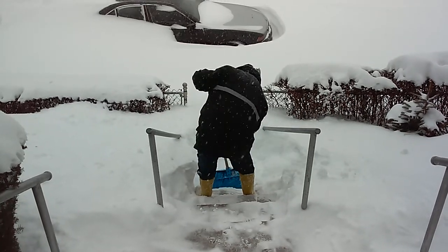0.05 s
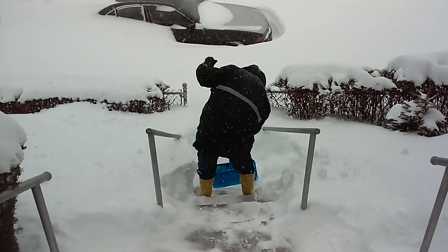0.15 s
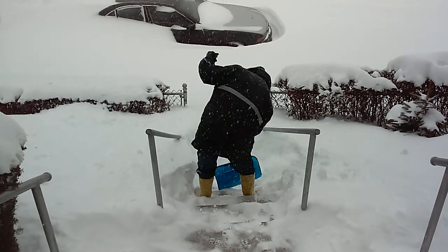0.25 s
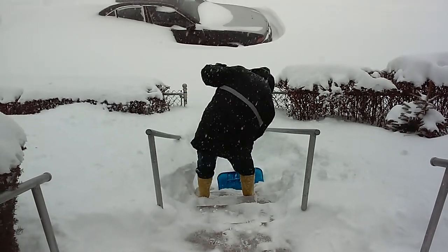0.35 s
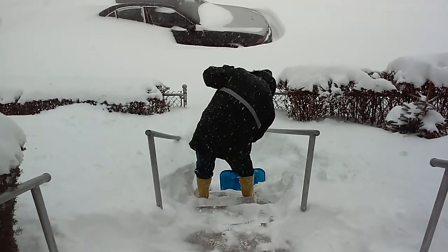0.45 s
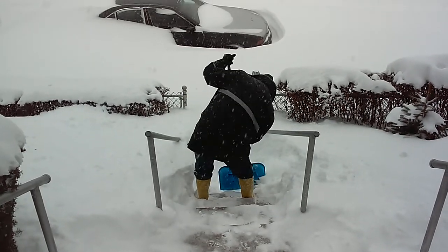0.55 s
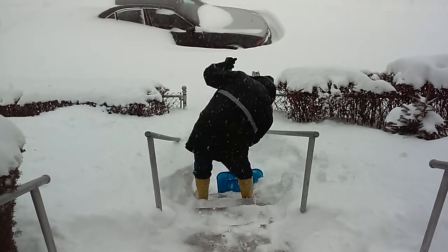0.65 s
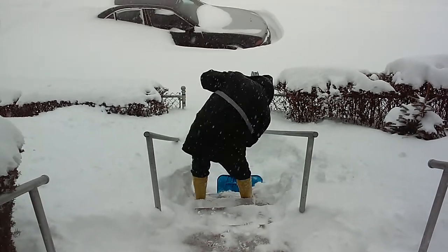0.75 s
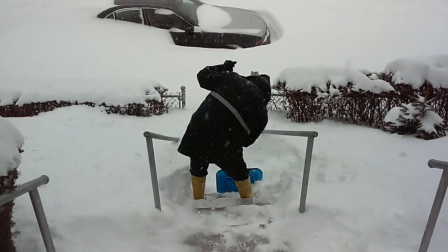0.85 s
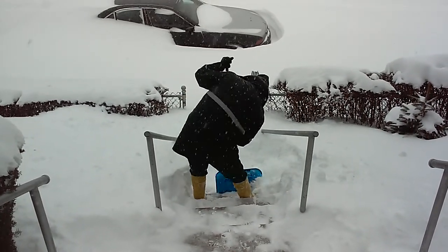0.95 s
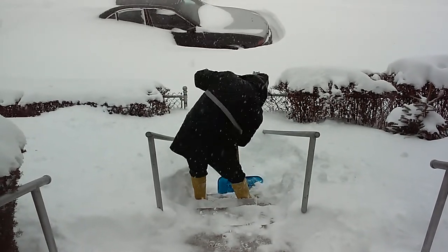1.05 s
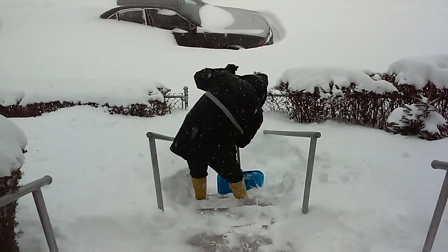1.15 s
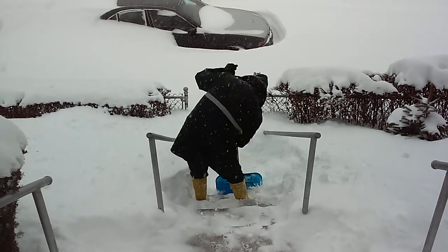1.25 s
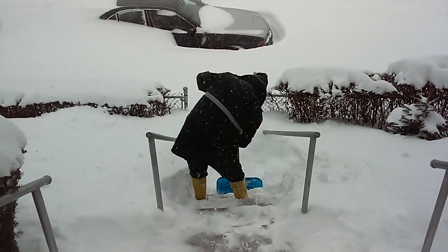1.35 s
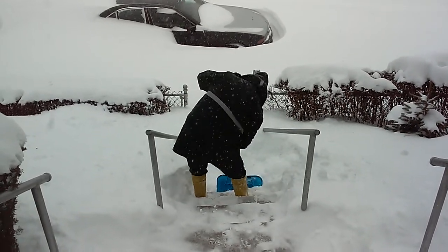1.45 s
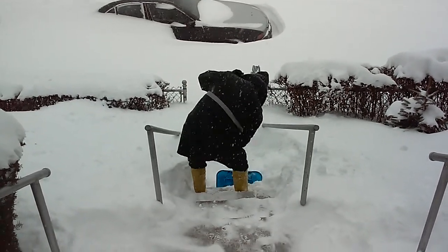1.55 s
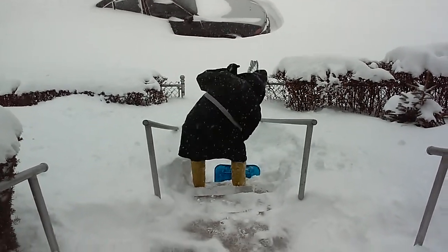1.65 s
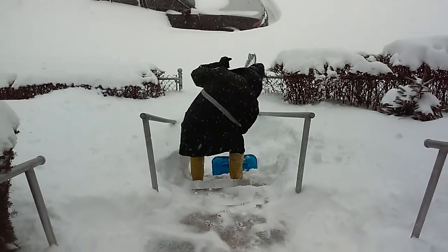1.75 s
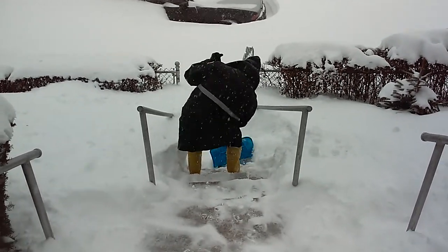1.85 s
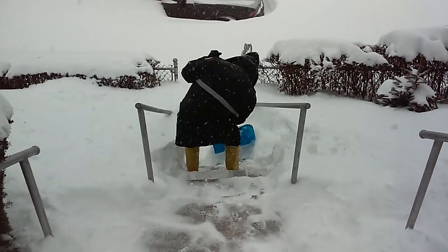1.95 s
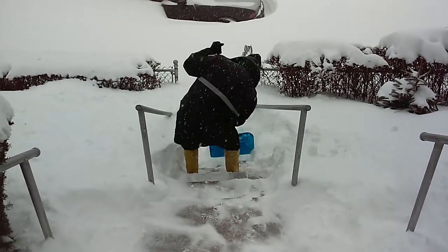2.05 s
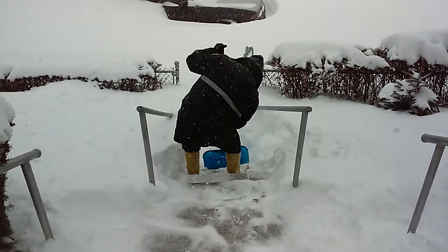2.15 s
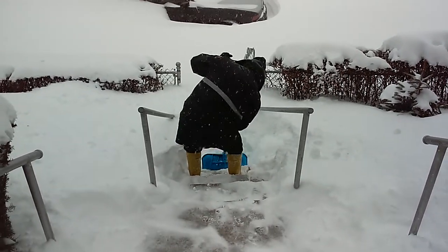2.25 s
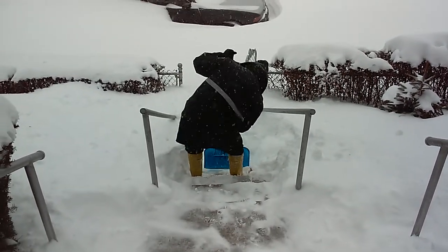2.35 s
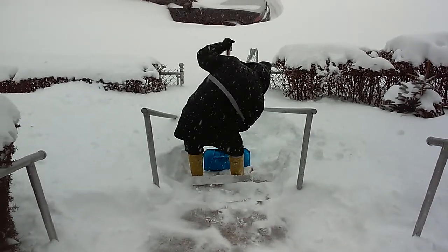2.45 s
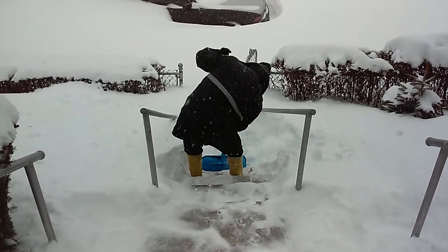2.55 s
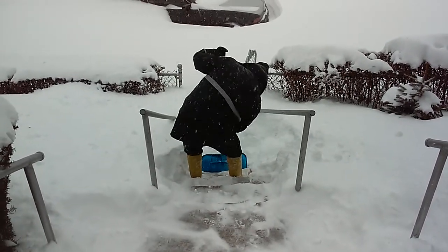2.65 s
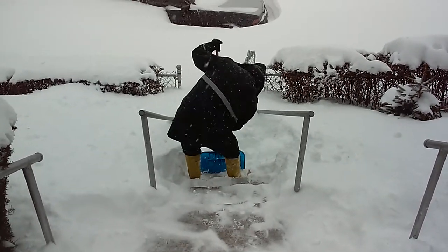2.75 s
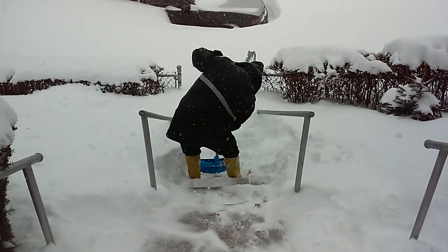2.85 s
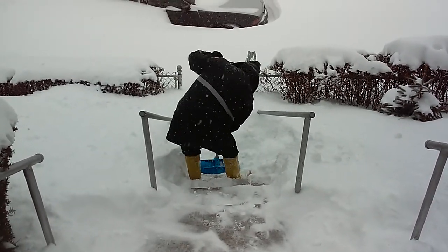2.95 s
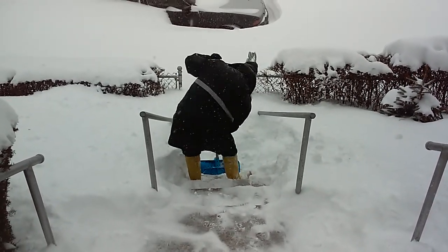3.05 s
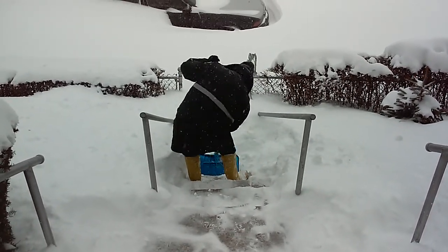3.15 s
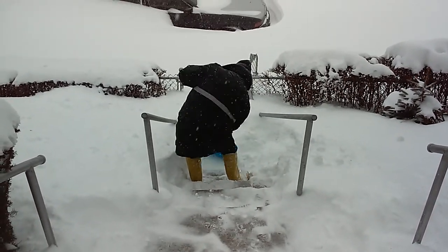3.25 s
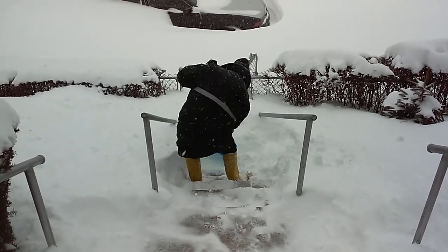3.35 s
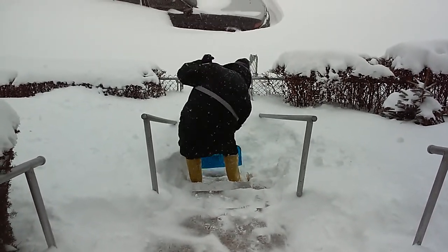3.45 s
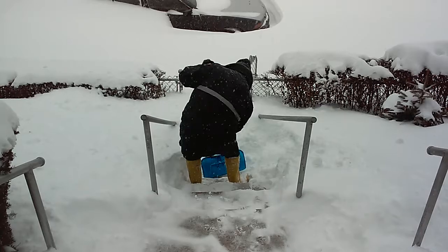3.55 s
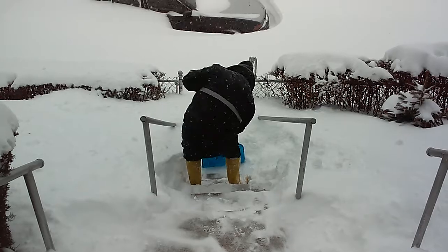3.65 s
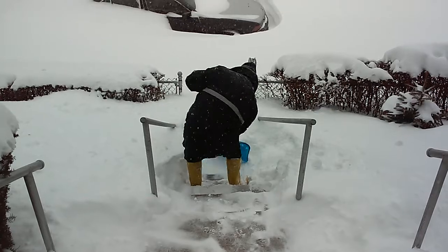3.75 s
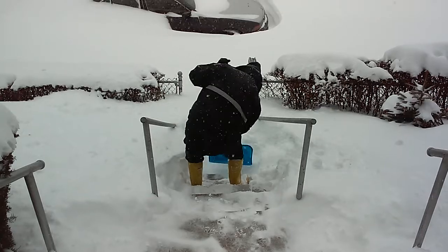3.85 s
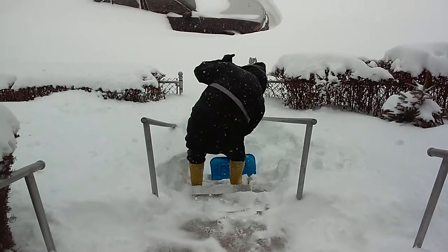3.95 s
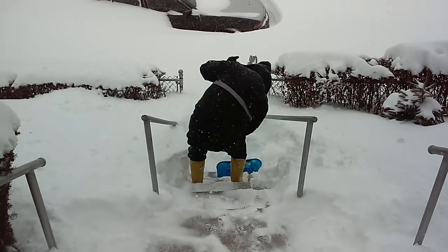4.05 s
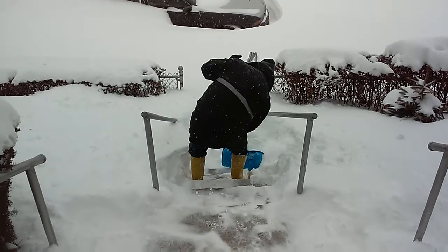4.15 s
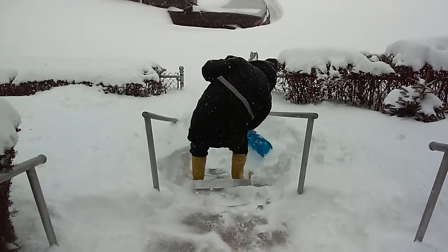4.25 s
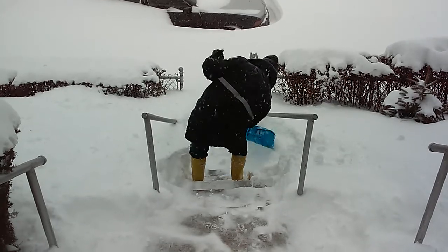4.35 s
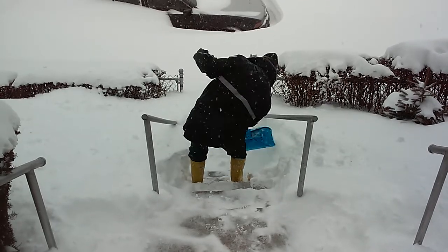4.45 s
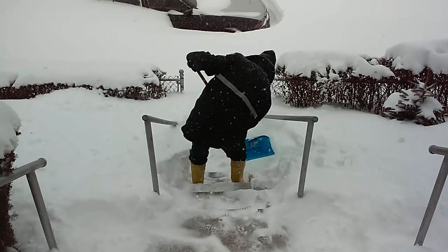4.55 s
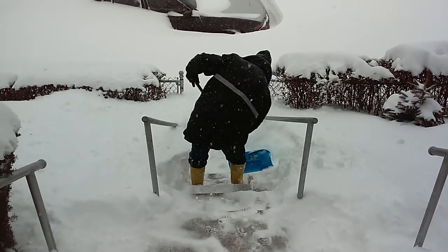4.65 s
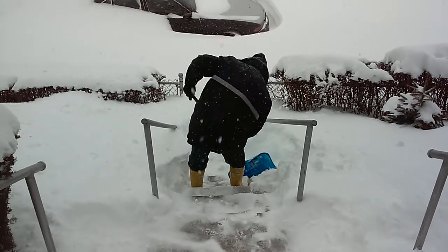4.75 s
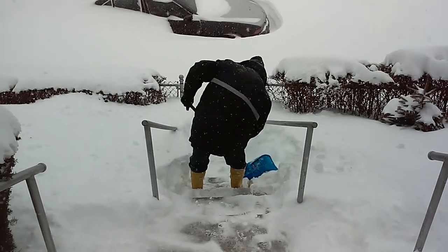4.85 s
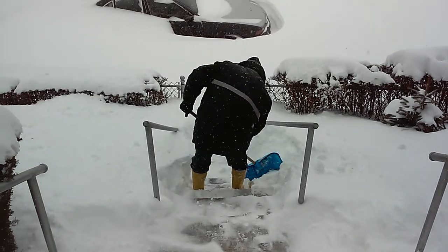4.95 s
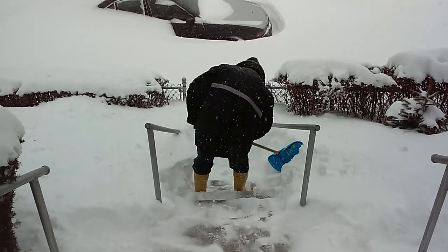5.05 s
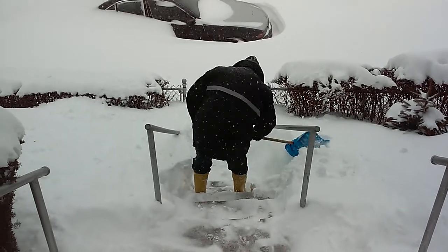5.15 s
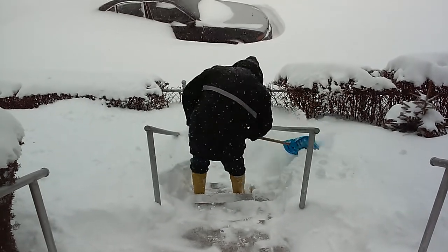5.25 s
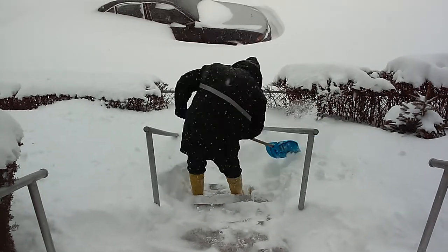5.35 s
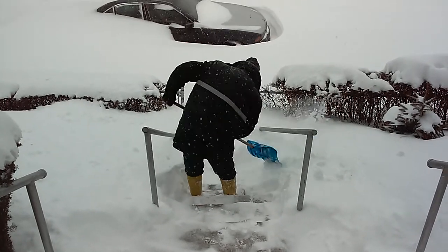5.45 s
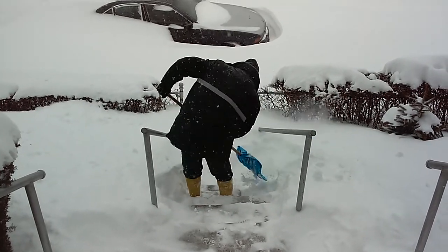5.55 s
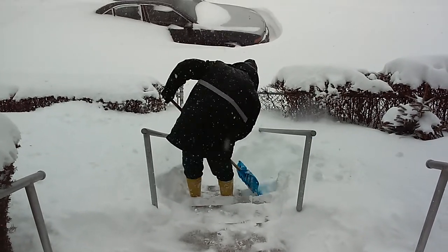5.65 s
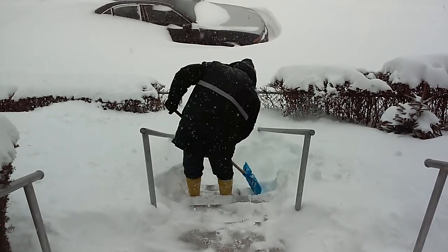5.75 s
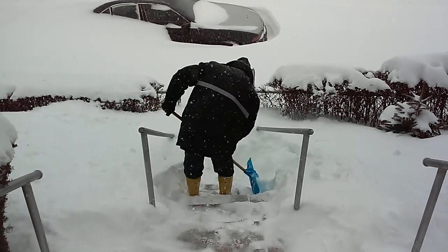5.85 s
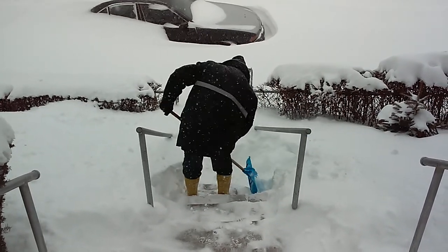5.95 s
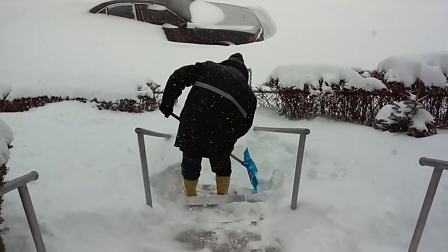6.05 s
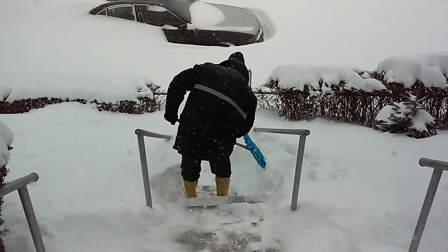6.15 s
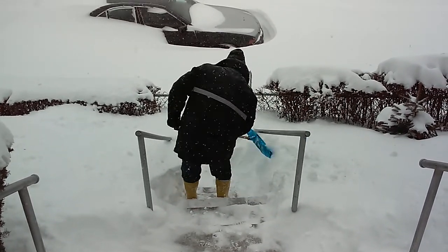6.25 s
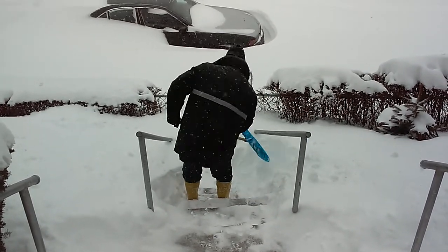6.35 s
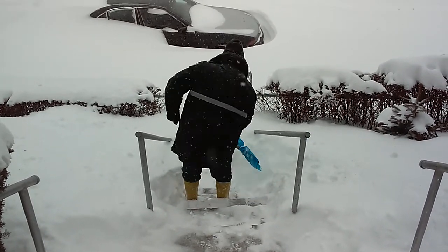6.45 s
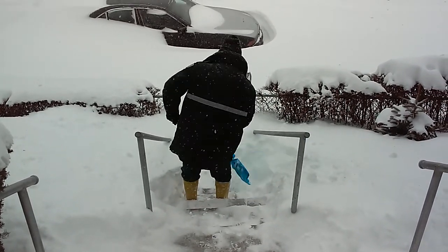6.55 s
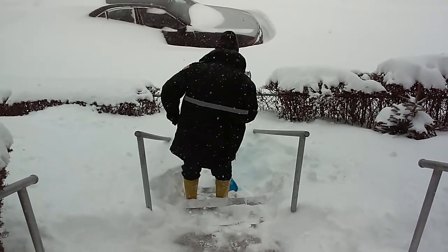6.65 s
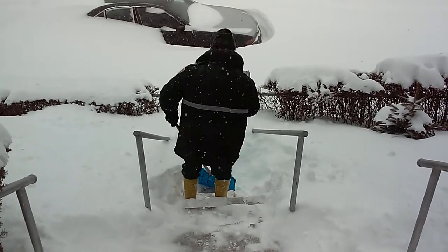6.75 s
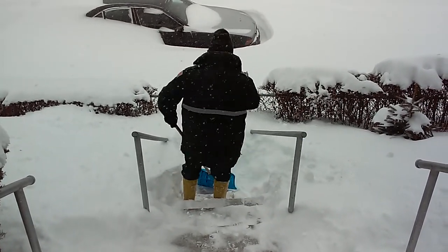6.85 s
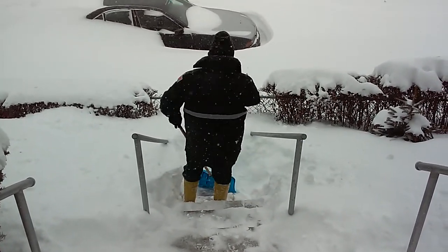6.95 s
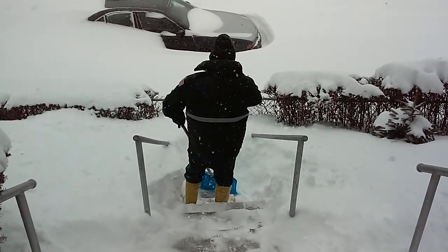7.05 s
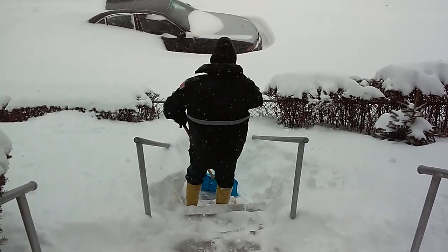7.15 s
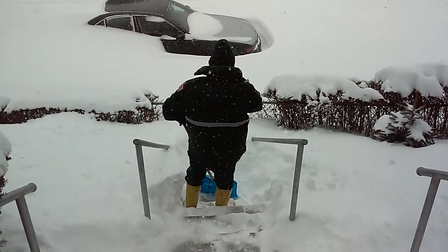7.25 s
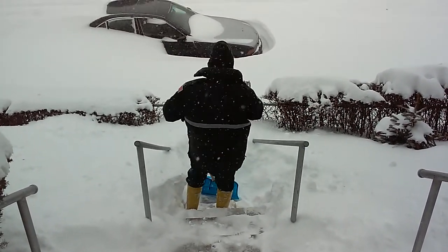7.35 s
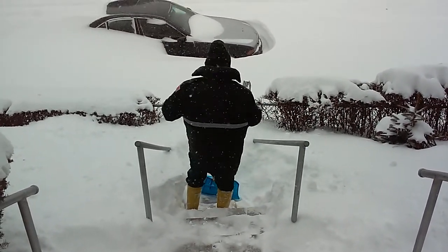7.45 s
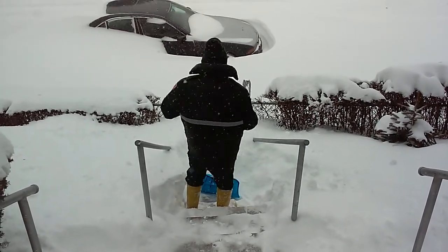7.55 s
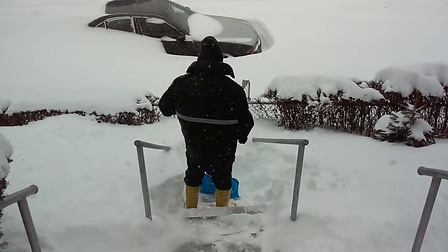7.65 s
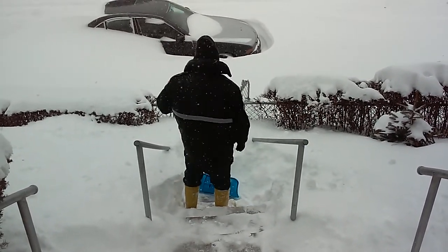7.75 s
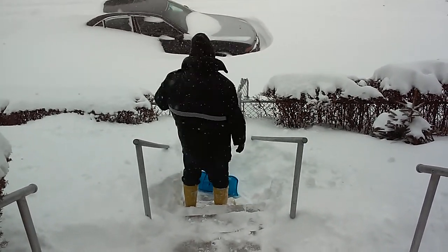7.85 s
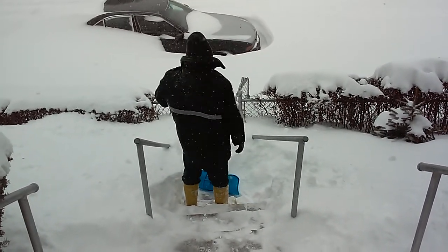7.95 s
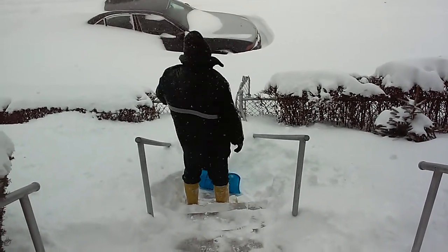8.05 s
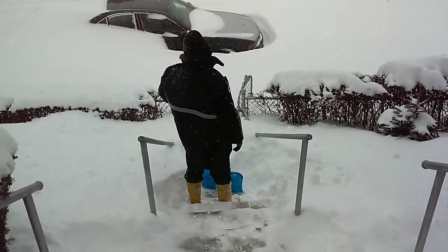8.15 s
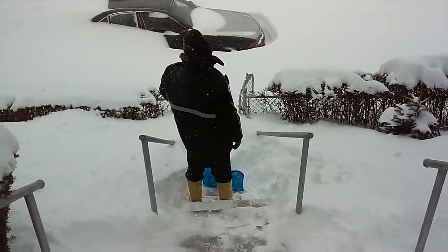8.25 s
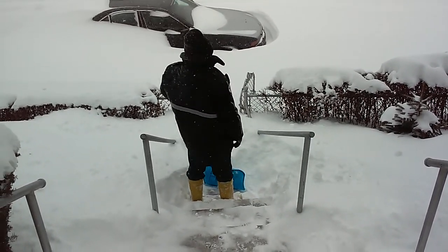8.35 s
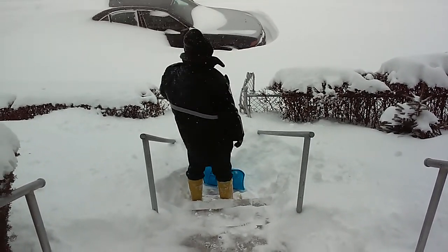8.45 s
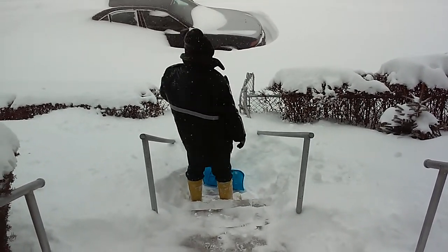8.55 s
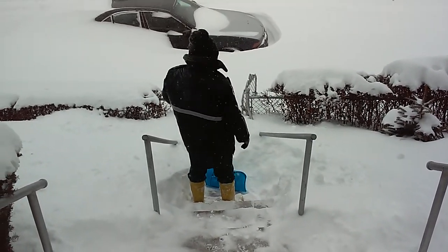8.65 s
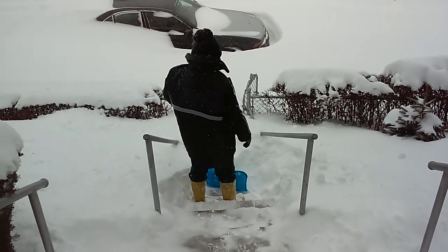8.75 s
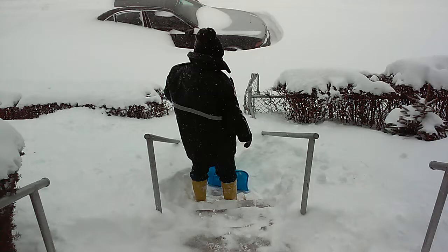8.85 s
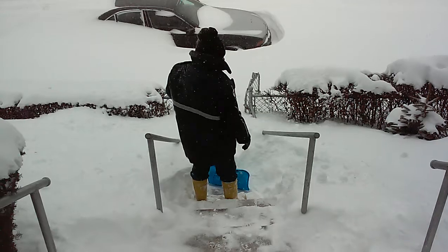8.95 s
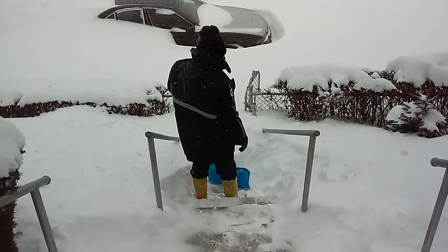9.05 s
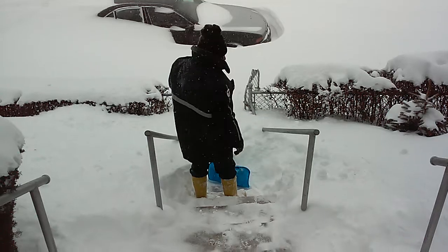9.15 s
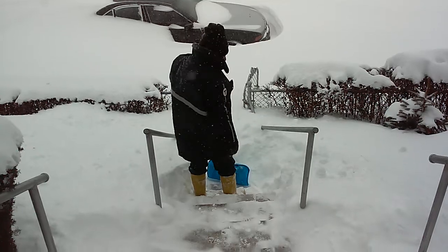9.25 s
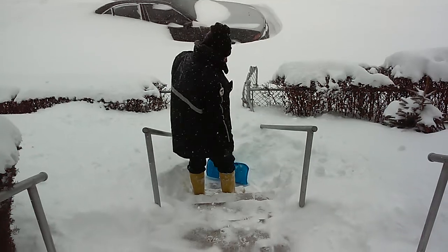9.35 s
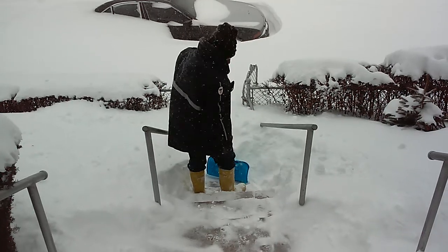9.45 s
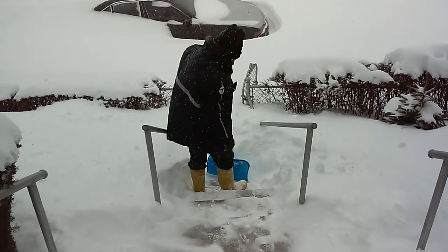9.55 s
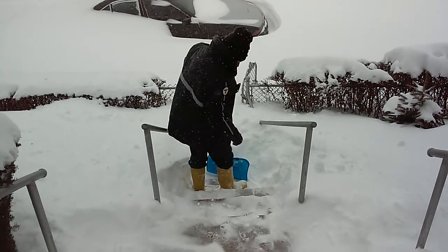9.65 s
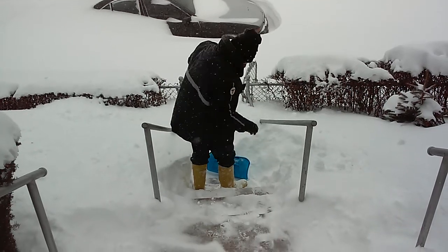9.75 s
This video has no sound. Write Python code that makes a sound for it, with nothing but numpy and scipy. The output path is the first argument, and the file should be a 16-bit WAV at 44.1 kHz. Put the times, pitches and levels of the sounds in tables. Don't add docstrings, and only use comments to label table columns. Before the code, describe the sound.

A plastic snow shovel knocks, chatters and scrapes on icy steps in irregular strokes, snow hissing off, over a faint engine hum and street hush.

```python
import sys
import numpy as np
from scipy import signal
from scipy.fft import rfft, irfft, next_fast_len
from scipy.io import wavfile
from scipy.ndimage import uniform_filter1d

SR = 44100
rng = np.random.default_rng(int(sys.argv[2]) if len(sys.argv) > 2 else 0)


def persist_wave(psi):
    counts = np.round(np.clip(psi, -1, 1) * 32767).astype(np.int16)
    wavfile.write(sys.argv[1], SR, np.atleast_2d(counts).T)


def amplitude_ratio(level_db):
    exponent = np.asarray(level_db, float) / 20
    return 10 ** exponent


N = 431719

# centre in Hz, width in Hz, level in dB.
BLADE_HIGH = [(415, 45, -0.5), (592.6, 76, 5), (693, 166, 0.5), (891, 154, 3), (993, 282, -0.5),
              (1378, 91, 0), (1760, 200, -2), (1910, 270, 0), (2196, 680, -15)]


def knocks():
    # frequency in Hz, level in dB.
    blade_low = [(122, 7), (182, 2.5), (236, -0.5), (287, 2.5)]
    out = np.zeros(N + SR)
    t = np.arange(SR // 6) / SR
    for s, db, upper_db, low_hz, upper_hz in blows():
        push = amplitude_ratio(db - 60 * t / 0.042) * np.sin(2 * np.pi * np.sqrt(205 * low_hz) * t)
        body = amplitude_ratio(db - 4.5 - 60 * t / 0.13) * ring(blade_low, low_hz, narrow_db=16.0, t=t)
        edge = amplitude_ratio(db + upper_db - 11.0 - 60 * t / 0.065) * ring(BLADE_HIGH, upper_hz, narrow_db=21, t=t)
        soft_start = 1 - np.exp(-t / 0.0018)
        sharp_start = 1 - np.exp(-t / 0.00024)
        out[round(s * SR):][:len(t)] -= (push + body) * soft_start + edge * sharp_start
    return out[:N]


def blows():
    # start in seconds, peak in dB, upper modes in dB, favoured low mode in Hz,
    # favoured upper mode in Hz.
    first_blows = [(0.068, -7.5, -6, 260, 880), (0.754, -30, -3, 170, 905), (0.8335, -3, -4.5, 265, 610),
                   (1.023, -20, -24, 123, 630), (1.08, -22.5, -2, 150, 930), (1.1452, -0.5, -4, 213, 670),
                   (1.297, -9, -23, 127, 700), (1.339, -14.5, -6.5, 178, 890), (1.4334, -0.5, -6, 210, 725),
                   (1.6038, -17.5, -16, 180, 560), (1.8075, -10.5, -16, 205, 640),
                   (2.3556, -2, -13.5, 194, 800), (2.5653, -3, 6, 226, 945), (2.6874, -1.5, -9, 211, 900),
                   (2.772, -1.5, -10, 265, 850), (2.886, -20.5, 7, 274, 990), (3.149, -29, -8, 258, 700),
                   (3.2097, -2.5, -7.5, 180, 630), (3.6495, -12.5, -7.5, 280, 724),
                   (3.7309, -18.5, 7.5, 293, 930), (4.1618, -11.5, -24, 136, 900),
                   (4.913, -18.5, -12, 183, 596), (4.998, -21, 1, 196, 775), (5.8047, -25, -2, 178, 700),
                   (6.7694, -20.5, 0.5, 184, 900)]
    chatter = [(1.8269, -0.5, -11.5, 190, 680), (1.8434, -1.5, -6, 175, 666), (1.8544, -3.5, -21, 177, 800),
               (1.8726, -4.5, -2.5, 205, 650), (1.8902, -0.5, -11, 233, 600), (1.9111, -6, -14, 150, 670),
               (1.921, -3.5, -9, 144, 670), (1.935, -10, -3, 141, 900), (2.7912, -7, -3, 238, 856),
               (2.8044, -5, -8, 213, 790), (3.228, -4, -12, 188, 720), (3.237, -3, -4, 185, 720),
               (3.2576, -6.5, 3, 190, 730), (3.276, -15.5, -11, 194, 720), (4.186, -1.5, -10.5, 188, 940),
               (4.2057, -3, -23, 168, 650), (4.2254, 0, -14, 151, 600), (4.241, -22, 8.5, 151, 820),
               (4.935, -21, -7, 182, 596), (5.0142, -18, -5, 175, 635), (5.0249, -31, -4, 178, 640),
               (5.0371, -23, 6, 180, 800), (5.8329, -17.5, -4, 186, 960), (5.8595, -11, 4, 183, 800),
               (5.8776, -17.5, -6, 188, 900)]
    return sorted([*first_blows, *chatter], key=lambda row: row[0])


def ring(modes, spot_hz, narrow_db, t):
    hz, db = np.array(modes)[:, 0], np.array(modes)[:, -1]
    scatter_db = 2.5 * rng.standard_normal(len(hz))
    detune = 1 + 0.015 * rng.standard_normal(len(hz))
    db = db - narrow_db * np.abs(np.log2(hz / spot_hz)) + scatter_db
    return amplitude_ratio(db) @ np.sin(2 * np.pi * np.outer(hz * detune, t))


def slide():
    # frequency in Hz, gain in dB.
    hiss_colour = [(3240, -25), (5500, -27), (6340, -19.5), (8750, -15), (9860, -9.5), (10900, -7),
                   (11700, -6), (12600, -2), (13600, -5.5), (14600, -8.5), (15700, -11.5), (16300, -19),
                   (16500, -59.5)]
    # centre in Hz, width in Hz, level in dB.
    grit_modes = [(3297, 484, 1), (3846, 620, -0.5), (4500, 970, -8.5), (5400, 1700, -36.5),
                  (7100, 2200, -15.5)]
    power = strokes()
    force = np.clip((10 * np.log10(power[1]) + 62) / 18, 0, 1)
    clump_db = force * (2.1 * wobble(45) + 0.82 * wobble(140))
    coarse_db = force * 3.5 * wobble(80)
    hiss = power[0] * amplitude_ratio(clump_db) ** 2
    grit, rattle, rasp = power[1:] * amplitude_ratio(clump_db + coarse_db) ** 2
    add_bursts(hiss, grit, rattle, rasp)

    fizz = patchy(grainy(rate=2300, spread_db=6.5, share=0.33), depth_db=1.7)
    fizz = filtered(fizz, colour(hiss_colour))
    grind = patchy(grainy(rate=900, spread_db=3.0, share=0.24), depth_db=1.56)
    grind = filtered(grind, lambda hz: resonant(grit_modes)(hz) * highpass(hz, 2900) ** 3)
    drag = patchy(grainy(rate=600, spread_db=15.0, share=0.17), depth_db=3.0)
    scoop = filtered(drag, resonant([(170, 82, 3.2), (265, 82, 0.35), *BLADE_HIGH[:5]]))
    lip = filtered(drag, lambda hz: resonant(BLADE_HIGH[5:])(hz) * highpass(hz, 1100))
    shake = np.sqrt(rattle) * unit(scoop) + np.sqrt(rasp) * unit(lip)
    return np.sqrt(hiss) * unit(fizz) + np.sqrt(grit) * unit(grind) + shake


def add_bursts(hiss, grit, rattle, rasp):
    # start in seconds, peak in dB, grit re peak in dB, T60 in seconds.
    cracks = [(0.0662, -10.5, -39.5, 0.054), (0.754, -20.5, -10.5, 0.092), (0.8106, -7.5, -26, 0.09),
              (0.8324, 0.5, -10.5, 0.019), (1.019, -10.5, -42, 0.04), (1.1453, -1, -17, 0.029),
              (1.259, -24, -14, 0.074), (1.298, -12.5, -20, 0.1), (1.3566, -8.5, -21.5, 0.058),
              (1.8263, -19.5, -34, 0.096), (1.904, -16, -7, 0.3), (2.3541, -3.5, -13.5, 0.028),
              (2.564, -0.5, -7, 0.074), (2.6863, 0, -17, 0.028), (2.753, -12, -27, 0.17),
              (2.8849, -28, -13, 0.068), (3.207, -10.5, -21.5, 0.11), (3.22, -4.5, -13, 0.073),
              (3.2568, -1.5, -19.5, 0.17), (3.6475, -8.5, -29.5, 0.013), (3.72, -7.5, -29.5, 0.16),
              (3.7243, 1.5, -19, 0.099), (4.1713, -5.5, -14.5, 0.023), (4.246, -9, -18.5, 0.084),
              (4.3095, 5, -36.5, 0.053), (4.314, 4, -32.5, 0.051), (4.7557, -1.5, -24, 0.018),
              (5.1245, -4, -19, 0.12), (5.799, -4, -15.5, 0.068), (6.1892, 8, -7, 0.02),
              (6.769, -16, -26, 0.04), (8.441, -43, -10, 0.062), (9.0506, -14.5, -44, 0.0086)]
    # start in seconds, level in dB, T60 in seconds.
    nicks = [(0.757, -39, 0.07), (1.079, -33, .06), (1.1453, -17, 0.036), (1.258, -38.5, 0.065),
             (1.367, -33.5, 0.056), (1.436, -39, 0.029), (1.8555, -34, 0.045), (1.874, -29.5, .08),
             (1.935, -30, .08), (2.356, -29, .08), (2.772, -25.5, 0.16), (4.187, -28, 0.046),
             (4.248, -27, 0.056), (5.138, -34, 0.019), (5.799, -31, 0.061), (6.769, -31, 0.081),
             (8.442, -47, 0.063)]
    # start in seconds, hiss in dB, grit in dB.
    ticks = [(0.0898, -34.0, -56), (1.0726, -26, -47.0), (1.079, -22, -32.5), (1.1374, -16, -39.0),
             (1.2452, -28, -45), (1.308, -30.0, -50.0), (1.3639, -23.0, -33), (1.4173, -21, -37),
             (1.4268, -33, -42), (1.4342, -26.0, -49), (1.5086, -46, -64), (1.604, -39.0, -44),
             (1.7889, -37, -56.0), (1.8094, -31, -39), (1.8293, -29.0, -36), (1.8448, -27.0, -39),
             (1.856, -14, -40), (1.8742, -33, -33), (1.882, -27, -31), (1.8907, -18, -27),
             (1.9084, -13, -37), (1.9136, -24, -23), (1.95, -8.5, -33), (1.958, -16, -30),
             (1.977, -11.0, -36.0), (1.985, -19, -33), (2.0309, -28, -46.0), (2.2224, -39.0, -68.0),
             (2.3656, -35.0, -39.0), (2.3846, -28.0, -57), (2.3931, -27, -54), (2.5685, -28, -18.5),
             (2.5886, -19, -34.0), (2.598, -20.0, -36.0), (2.6041, -19.0, -38), (2.7712, -26, -33),
             (2.7777, -26, -26), (2.804, -17, -39), (2.8151, -22, -33), (2.823, -29, -29),
             (2.878, -32.0, -36), (2.8859, -25.0, -26), (2.8984, -26, -22), (2.919, -26, -28)]
    # start in seconds, hiss in dB, grit in dB.
    late_ticks = [(3.1513, -26, -38), (3.1758, -37, -51.0), (3.2235, -6.5, -16), (3.2576, -12, -33),
                  (3.2643, -24, -18), (3.2711, -23, -39), (3.2955, -11, -39.0), (3.306, -17, -51),
                  (3.3419, -32, -60), (3.3688, -22, -46), (3.6517, -26, -43.0), (3.6617, -27, -49.0),
                  (3.692, -25, -41), (3.6996, -32.0, -53.0), (3.731, -4, -16), (3.739, -2.5, -30),
                  (3.7485, -29, -35), (3.8295, -19, -58), (4.1171, -33, -65.0), (4.1595, -29, -42),
                  (4.185, -26, -29), (4.2124, -25, -35), (4.2286, -16, -40), (4.248, -15, -29),
                  (4.2663, -22, -36), (4.3192, -24, -36.0), (4.5067, -25, -58.0), (4.5497, -34, -62.0),
                  (4.7607, -31.0, -52.0), (4.7766, -33, -56.0), (4.9762, -21, -41), (4.983, -35, -33),
                  (5.0021, -27, -36), (5.0306, -31.0, -29), (5.038, -40, -34.0), (5.0875, -20, -44),
                  (5.117, -21.0, -30), (5.1254, -11.5, -33), (5.1318, -8, -41), (5.1378, -4, -40),
                  (5.8068, -32, -34), (5.8337, -15, -48.0), (5.858, -17, -25), (5.8682, -23.0, -39),
                  (5.876, -16, -39.0), (5.8866, -26, -45.0), (5.9784, -33, -67), (6.151, -25.5, -38.0),
                  (6.1954, -33, -32), (6.2009, -25.5, -28), (6.231, -25, -36), (6.2982, -35, -59.0),
                  (6.7884, -34.5, -60), (6.81, -26, -56), (6.833, -16.5, -45), (6.8434, -21, -29.5),
                  (7.0824, -33.5, -64.0), (8.0537, -36.0, -53), (8.1694, -48.0, -45), (8.177, -55, -44)]
    crack_rise_s, tick_rise_s = 0.00054, 0.0011
    for s, db, rel_db, t60_s in cracks:
        add(hiss, s, db - 13.5, t60_s, crack_rise_s)
        add(grit, s, db + rel_db - 7.5, t60_s, crack_rise_s)
    for s, db, t60_s in nicks:
        add(rasp, s, db, t60_s, crack_rise_s)
    for s, hiss_db, grit_db in [*ticks, *late_ticks]:
        add(hiss, s, hiss_db + 1, 0.023, tick_rise_s)
        add(grit, s, grit_db + 1.5, 0.036, tick_rise_s)
    for s, db, upper_db, *_ in blows():
        add(hiss, s, db - 39, t60_s=0.014)
        add(grit, s, db + upper_db - 22, t60_s=0.046)
        add(rasp, s, db + upper_db - 23, t60_s=0.048)
        add(rattle, s, db + upper_db / 2 - 15.5, t60_s=0.12)


def add(power, s, db, t60_s, rise_s=0.00014):
    part = power[round(s * SR):][:int(t60_s * SR)]
    t = np.arange(len(part)) / SR
    part += amplitude_ratio(db - 60 * t / t60_s) ** 2 * (1 - np.exp(-t / rise_s))


def strokes():
    # peak in seconds, hiss in dB, rise in seconds, fall in seconds,
    # drag on the blade in dB; rise and fall span 20 dB or more.
    scrapes = [(.082, -39.5, 0.066, 0.16, -6), (.5, -37, 0.28, 0.16, -44), (.771, -42, 0.042, 0.43, -18),
               (.833, -32, 0.06, 0.11, -8.5), (1.13, -31.5, 0.21, 0.14, -9.5),
               (1.354, -38.5, 0.13, 0.33, -2.5), (1.432, -24.5, 0.11, 0.011, -32),
               (1.86, -29.5, 0.033, 0.26, -2), (2.37, -37.5, 0.09, 0.12, -2.5),
               (2.579, -29.5, 0.0096, 0.097, 3.5), (2.691, -30, 0.094, 0.055, -11),
               (2.786, -51, 0.17, 1, -11), (2.895, -28, 0.14, 0.13, -2.5), (3.16, -34, 0.036, 0.03, -12.5),
               (3.22, -23, 0.017, 0.094, 3), (3.278, -31, 0.22, 0.13, -1), (3.652, -52, .012, .3, -16),
               (3.735, -21.5, 0.02, 0.081, -6), (4.21, -35.5, 0.11, 0.24, -0.5),
               (5.025, -32, 0.21, 0.086, -2.5), (5.864, -29.5, 0.091, 0.057, 4),
               (6.144, -26.5, 0.075, 0.07, -11.5), (6.206, -30, 0.12, 0.089, -10.5),
               (6.844, -40.5, 0.31, 0.12, -3.5)]
    spills = [(1.776, -36, 0.92, 0.27, -15), (1.975, -14, 0.073, 0.065, -17.5),
              (2.337, -36, 0.068, 0.11, -24), (2.963, -27, 0.039, 0.04, -11), (3.355, -25, 0.13, 0.07, -37),
              (3.69, -38.5, 0.036, 0.11, -9), (4.158, -50, 0.047, .3, -26), (4.34, -26, 0.2, 0.31, -14.5),
              (4.772, -35.5, 0.099, 1.2, -16), (4.966, -47, 0.25, 1.6, -7),
              (5.136, -20.5, 0.075, 0.13, -16.5), (5.76, -46.5, 0.71, 0.13, -46.5),
              (5.812, -32, 0.055, 0.067, -25), (6.76, -70, 0.71, .1, -22), (7.775, -36.5, 0.36, 0.81, -12),
              (8.62, -45.5, 0.23, 0.35, -4), (9.1, -54, 3.1, 3, 0.5), (9.78, -50, 0.8, .8, -2)]
    # peak in seconds, hiss in dB, fall in seconds.
    trickle_rows = [(.15, -47, 0.18), (.86, -43, 0.42), (1.19, -41, 0.42), (1.498, -80, 0.35),
                    (2.07, -42, 0.42), (2.45, -45, 0.25), (3.0, -73, 0.048), (3.42, -45.5, 0.26),
                    (3.78, -32, 0.26), (4.6, -49, 1), (5.26, -53, 0.21), (5.91, -40, 0.2),
                    (6.27, -43, 0.35), (6.9, -42, 0.51)]
    rise_s, trickle_drag_db = 0.033, -8.5
    trickles = [(s, db, rise_s, fall, trickle_drag_db) for s, db, fall in trickle_rows]
    power = 1e-9
    # movements, grit re hiss in dB, lip re scoop in dB
    for rows, grit_db, lip_db in [(scrapes, -6.5, -5.5), (spills, -20.5, -12.5), (trickles, -21, -12.5)]:
        for s, db, rise, fall, drag_db in rows:
            share_db = np.array([0, grit_db + 0.15 * drag_db, drag_db, drag_db + lip_db])
            contact = swell(s, 0.53 * rise, 0.84 * fall)
            shapes = np.array([swell(s, rise, fall), contact, contact, contact])
            power = power + amplitude_ratio(db + share_db[:, None]) ** 2 * shapes
    return np.array([sampled(row) for row in power])


def swell(s, rise_s, fall_s):
    t = np.arange(N * 1000 // SR + 2) / 1000 - s
    distance = np.where(t < 0, -t / rise_s, t / fall_s)
    return amplitude_ratio(-40 * distance ** 1.14)


def sampled(power):
    return np.interp(np.arange(N) * 1000 / SR, np.arange(len(power)), power)


def scuffs():
    # peak in seconds, level in dB, rise and fall in seconds, hollow in Hz, width over pitch.
    scuff_rows = [(1.68, -54, .25, 5800, .12), (1.68, -60, 0.29, 3700, 0.22),
                  (1.962, -28, 0.055, 900, 0.14), (2.9, -31.5, 0.054, 1900, .4),
                  (1.975, -31.5, 0.066, 268, 0.28), (2.495, -49, .04, 1890, .2),
                  (3.743, -20.5, 0.031, 950, .35), (3.74, -27, 0.032, 1520, 0.27),
                  (5.02, -45, 0.1, 880, 0.19), (6.11, -41, 0.027, 640, 0.17),
                  (6.145, -32.5, 0.055, 930, 0.2), (8.63, -48, 0.19, 1300, 0.44)]
    rub = amplitude_ratio(2.3 * wobble(70)) * rng.standard_normal(N)
    out = np.zeros(N)
    for s, db, length_s, hz, rel_width in scuff_rows:
        near = slice(round((s - 2 * length_s) * SR), round((s + 2 * length_s) * SR))
        b, a = signal.iirpeak(hz, 1 / rel_width, SR)
        hollow = signal.lfilter(b, a, signal.lfilter(b, a, rub[near]))
        envelope = np.sqrt(sampled(swell(s, length_s, length_s))[near])
        out[near] += amplitude_ratio(db) * envelope * unit(hollow)
    return out


def squeaks():
    # start in seconds, level in dB, start pitch in Hz, length in seconds, end pitch in Hz.
    squeak_rows = [
        (3.61, -51, 3170, 0.04, 3200),
        (8.168, -41, 2930, 0.008, 3660),
        (8.174, -47, 5560, 0.0093, 4500),
        (8.444, -48, 1490, 0.022, 1400),
    ]
    out = np.zeros(N)
    for s, db, hz, length_s, end_hz in squeak_rows:
        pitch_hz = np.linspace(hz, end_hz, int(length_s * SR))
        tone = np.sin(2 * np.pi * np.cumsum(pitch_hz) / SR)
        out[round(s * SR):][:len(tone)] += amplitude_ratio(db) * tone * np.sqrt(np.hanning(len(tone)))
    return out


def yard():
    # time in seconds, level in dB.
    yard_level = [(0, -48.5), (.7, -54.5), (1.4, -40), (1.75, -50.5), (2.0, -43), (2.3, -53), (2.7, -39),
                  (3.1, -50.5), (3.35, -43.5), (3.6, -52), (4.0, -49), (5.5, -53), (6.3, -48), (6.7, -62.5),
                  (6.95, -53.5), (7.45, -59.5), (8.15, -51.5), (9.79, -56)]
    # time in seconds, speed in Hz.
    idle = [(0, 28.69), (2, 29.44), (5, 29.75), (9.79, 29.53)]
    # multiple of shaft speed, level in dB.
    orders = [(4, -4), (6, -10), (7, -7.5), (8, -23), (9, 3.5), (10, 1), (12, -8.5), (13, -20), (14, -8.5),
              (16, -9), (17, -9), (18, -6), (20, -7.5), (21, -6.5), (26, -33), (30, -12), (32, -33),
              (34, -18)]
    # frequency in Hz, gain in dB.
    street_colour = [(18, -32.5), (30, 4), (48, -6.5), (145, -1.5), (273, -2), (336, -6), (616, -17.5),
                     (801, -10.5), (2830, -30.5), (4300, -41), (6550, -36), (13000, -32), (16000, -22.5)]
    level_db, = curves(yard_level)
    shaft = 2 * np.pi * np.cumsum(curves(idle)[0]) / SR
    hum = 0
    for k, db in orders:
        phase = 1.16 * wobble(12) + 2 * np.pi * rng.random()
        hum = hum + amplitude_ratio(db + 2.95 * wobble(3.2)) * np.sin(k * shaft + phase)
    street = unit(filtered(rng.standard_normal(N), colour(street_colour)))
    near = amplitude_ratio(level_db) * (amplitude_ratio(-1.5) * hum + amplitude_ratio(2.5 + 3.0 * wobble(4.0)) * street)
    tyres_db, = curves([(0, -89), (8.1, -76), (8.5, -65.5), (9.3, -66.5), (9.79, -72)])
    tyres = unit(filtered(rng.standard_normal(N), lambda hz: resonant([(2700, 500, 0)])(hz) ** 2))
    return near + amplitude_ratio(tyres_db + 0.62 * wobble(4.0)) * tyres


def wind():
    # start in seconds, peak in dB, swing in Hz.
    eddies = [(4.49, -34, 50), (4.572, -36, 47.7), (4.62, -11.5, 91), (4.672, -33, 68), (8.245, -39, 100),
              (8.842, -38, 87), (8.875, -45, 35.2), (8.911, -42, 55.3), (9.05, -54, 30), (9.12, -37, 48.4),
              (9.19, -49, 35), (9.595, -32, 66), (9.625, -35, 50.5), (9.665, -36, 42), (9.71, -46, 25)]
    # frequency in Hz, gain in dB.
    gust_colour = [(15, 21), (40, -29), (90, -11.5), (200, -53)]
    flutter = unit(filtered(rng.standard_normal(N), colour(gust_colour)))
    out = amplitude_ratio(-64.0 + 2.7 * wobble(15)) * flutter
    cycles = 1.9
    for s, db, hz in eddies:
        u = np.arange(int(cycles / hz * SR)) * hz / SR
        envelope = 3 * u * np.exp(-1.3 * u) * np.cos(np.pi * u / 2 / cycles)
        swing = amplitude_ratio(db) * np.sin(2 * np.pi * u ** 0.89) * envelope
        part = out[round(s * SR):][:len(u)]
        part -= swing[:len(part)]
    return out


def unit(x):
    return x / np.sqrt(np.mean(x ** 2) + 1e-20)


def curves(rows):
    s, *cols = np.transpose(rows)
    return [np.interp(np.arange(N) / SR, s, c) for c in cols]


def wobble(rate):
    knots = rng.standard_normal(int(N * rate / SR) + 2)
    return np.interp(np.arange(N) * rate / SR, np.arange(len(knots)), knots)


def grainy(rate, spread_db, share):
    ticks = (rng.random(N) < rate / SR) * rng.standard_normal(N) * amplitude_ratio(spread_db * rng.random(N))
    return np.sqrt(1 - share) * rng.standard_normal(N) + np.sqrt(share) * unit(ticks)


def patchy(x, depth_db):
    z = signal.stft(x, nperseg=512)[2]
    field = uniform_filter1d(rng.standard_normal(z.shape), size=5, axis=0)
    field = uniform_filter1d(field, size=8, axis=1)
    return signal.istft(z * amplitude_ratio(depth_db * unit(field)), nperseg=512)[1][:N]


def filtered(x, response):
    m = next_fast_len(N + SR // 2)
    return irfft(rfft(x, m) * response(np.fft.rfftfreq(m, 1 / SR)), m)[..., :N]


def colour(points):
    f, db = np.transpose(points)
    return lambda hz: amplitude_ratio(np.interp(np.log(hz + 1), np.log(f + 1), db))


def highpass(hz, corner_hz):
    return 1j * hz / (corner_hz + 1j * hz)


def resonant(modes):
    def response(f):
        total = 0
        for k, (c, w, db) in enumerate(modes):
            total = total + (-1) ** k * amplitude_ratio(db) * 1j * f * w / (c * c - f * f + 1j * f * w)
        return total
    return response


def steps(hz):
    # centre in Hz, width in Hz, share cancelled from 0 to 1.
    hollows = [(363.5, 68, 0.38), (2710, 360, 0.32), (5420, 930, 0.2)]
    notches = [1 - share * resonant([(centre_hz, width_hz, 0)])(hz) for centre_hz, width_hz, share in hollows]
    return np.prod(notches, axis=0)


def scene():
    shovel = filtered(knocks() + slide(), steps)
    far = shovel + squeaks() + yard() + scuffs()
    return (filtered(far, lambda hz: highpass(hz, 75) ** 3) + wind())[None]


def roll_off(x):
    return signal.sosfilt(signal.butter(12, 16690, fs=SR, output="sos"), x)


def record(dry):
    top_hz = 15900
    clipped = dry / (1 + np.abs(dry / .92) ** 6) ** (1 / 6)
    narrow = filtered(clipped, lambda hz: np.where(hz < top_hz, 1, amplitude_ratio(-38.5)))
    return roll_off(narrow)


dry = scene()
out = record(dry)
persist_wave(out)
```